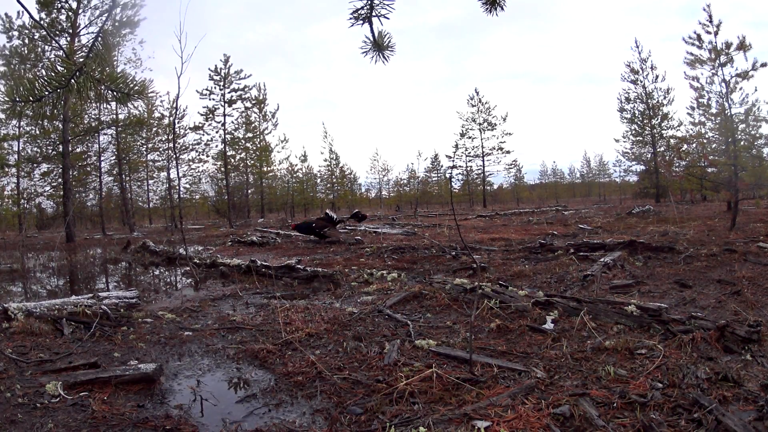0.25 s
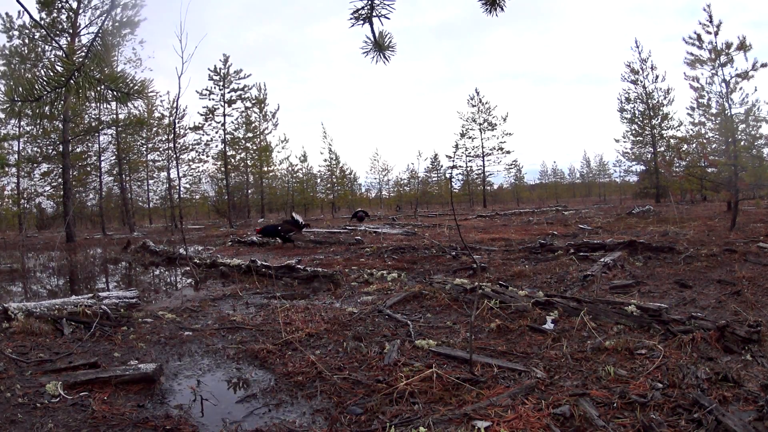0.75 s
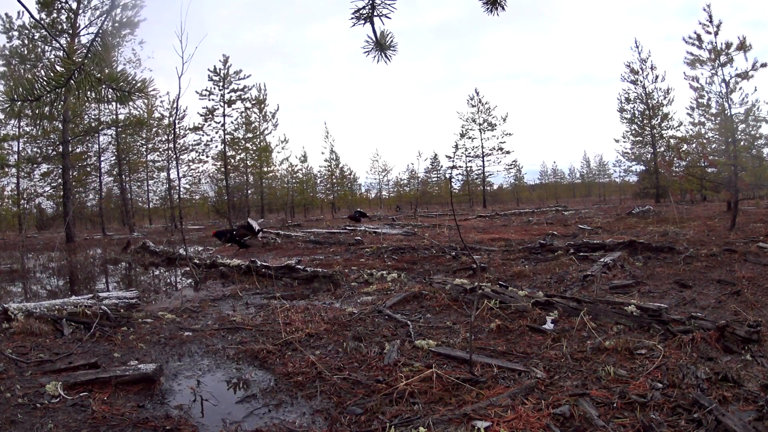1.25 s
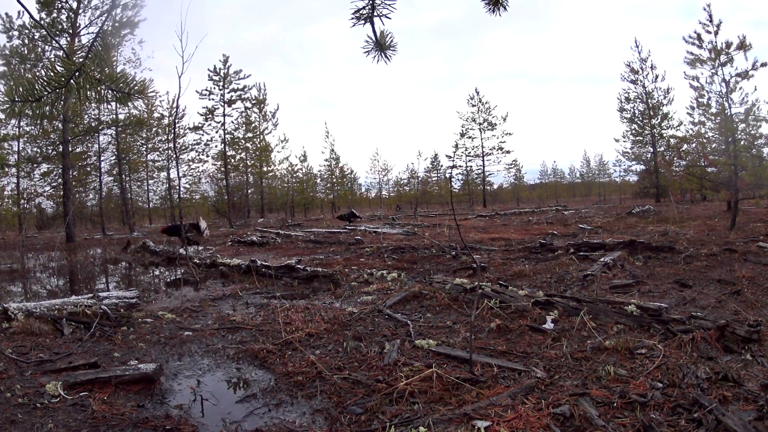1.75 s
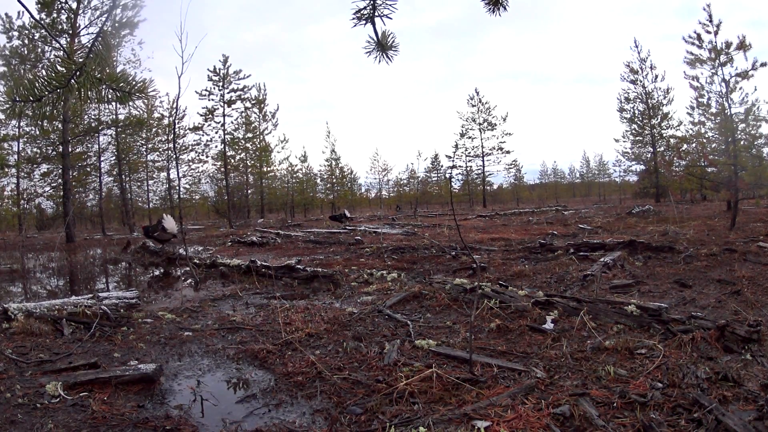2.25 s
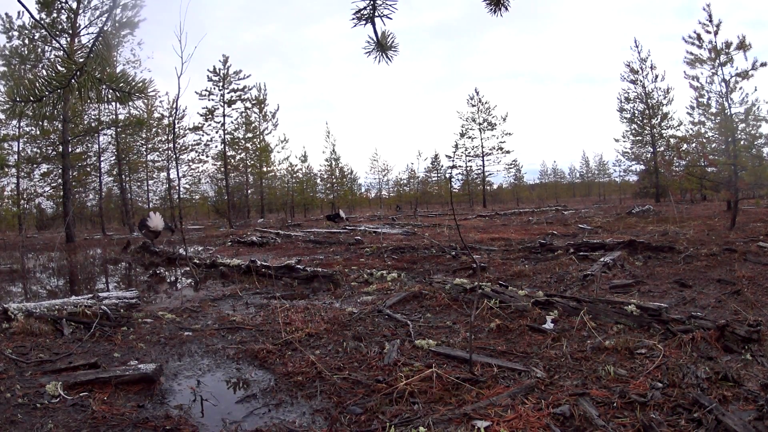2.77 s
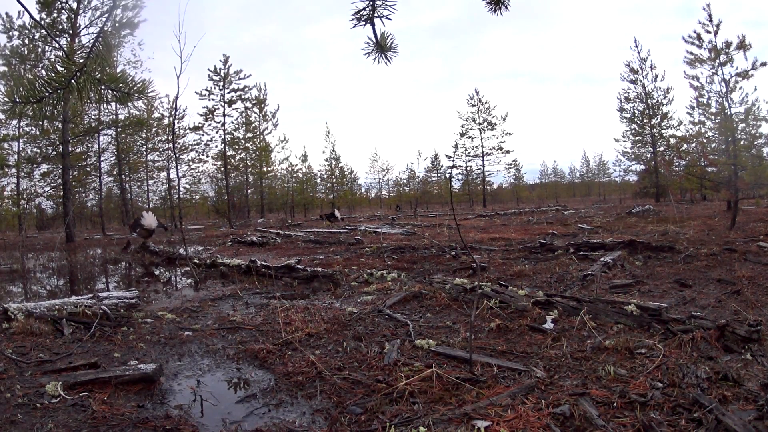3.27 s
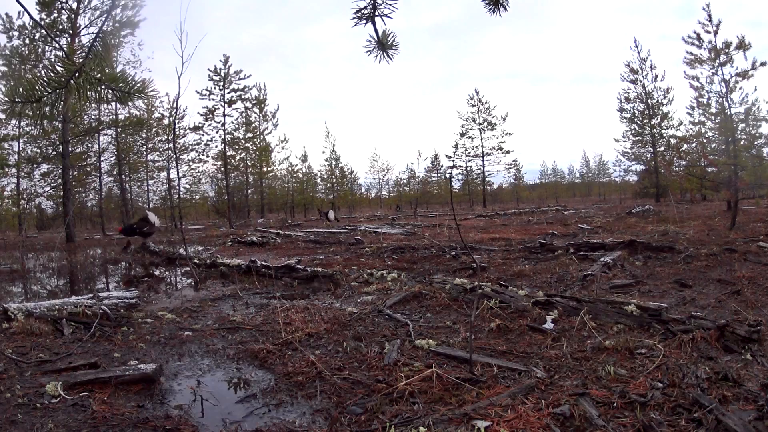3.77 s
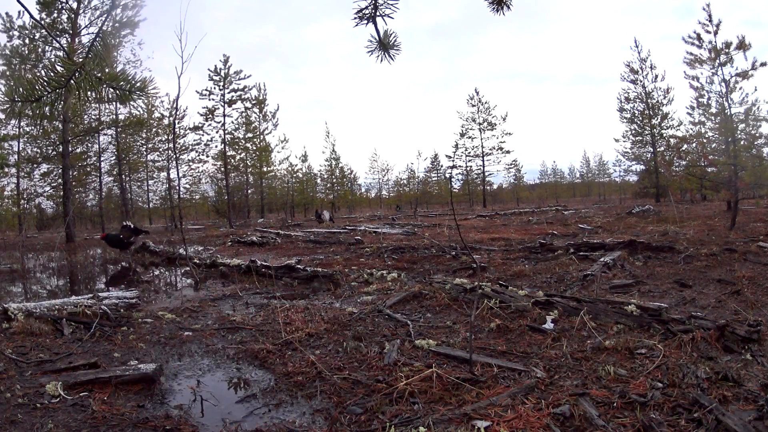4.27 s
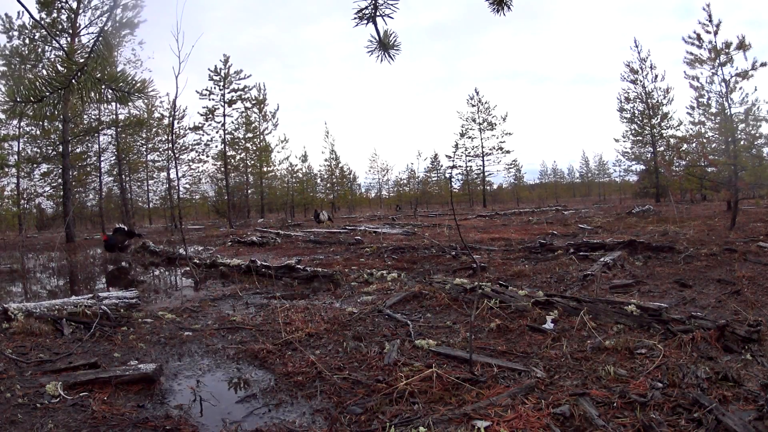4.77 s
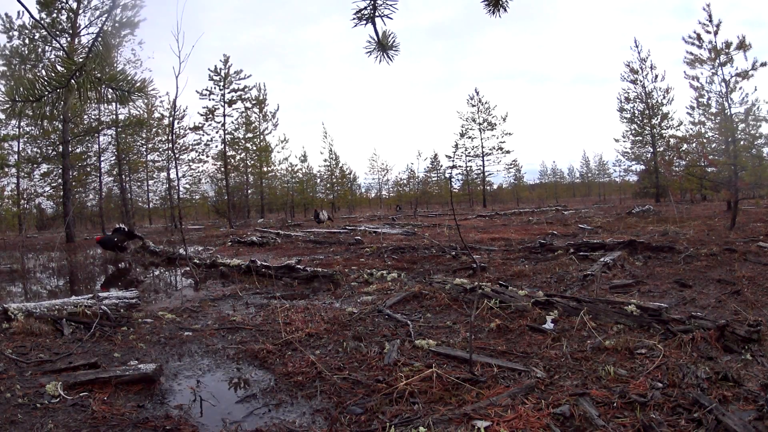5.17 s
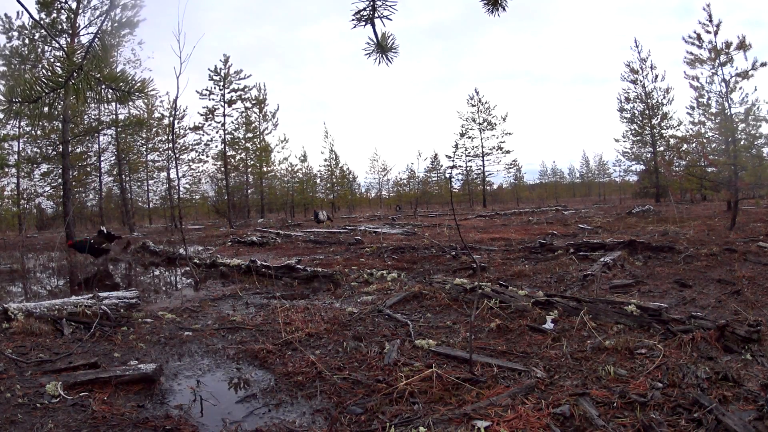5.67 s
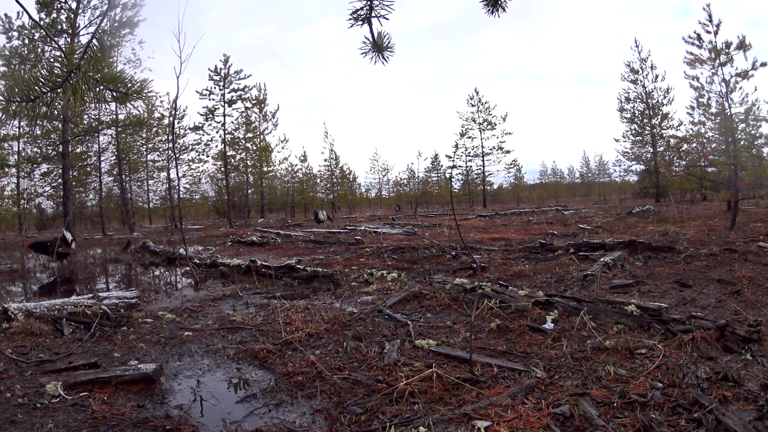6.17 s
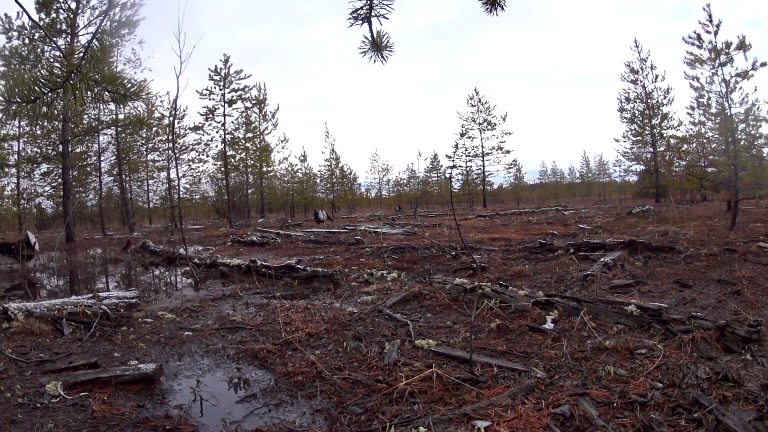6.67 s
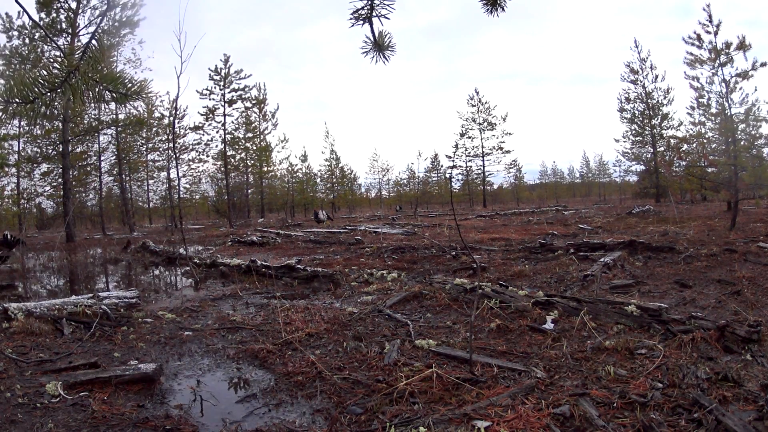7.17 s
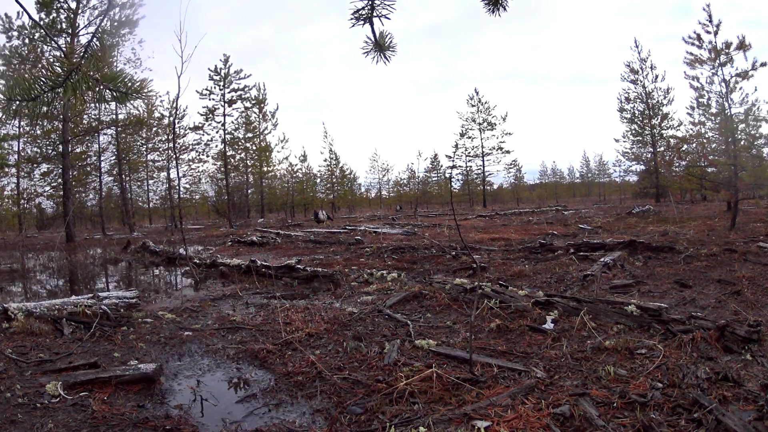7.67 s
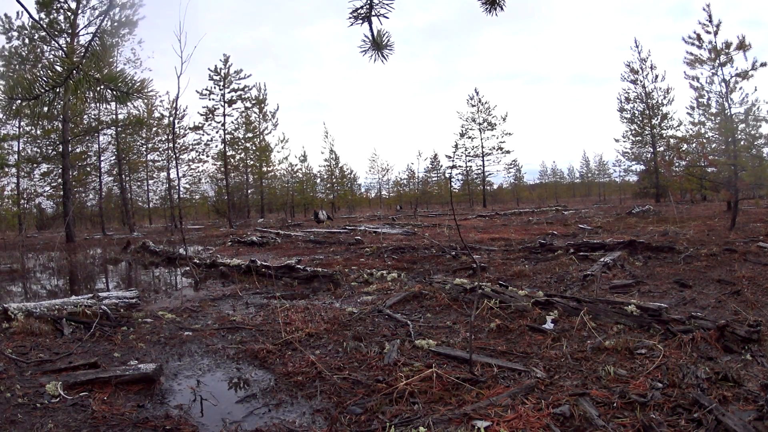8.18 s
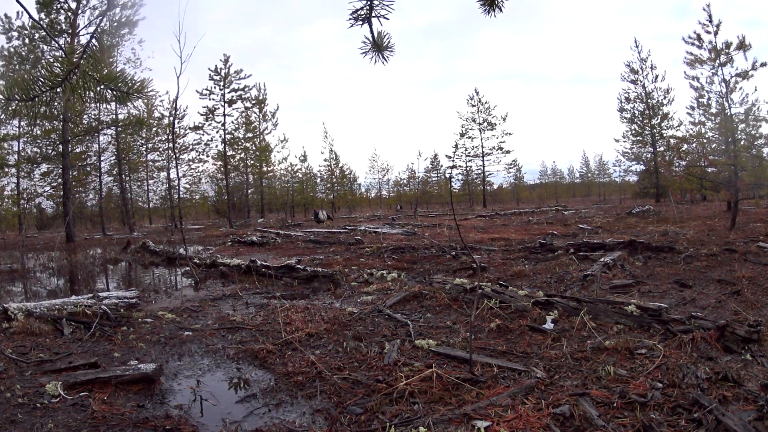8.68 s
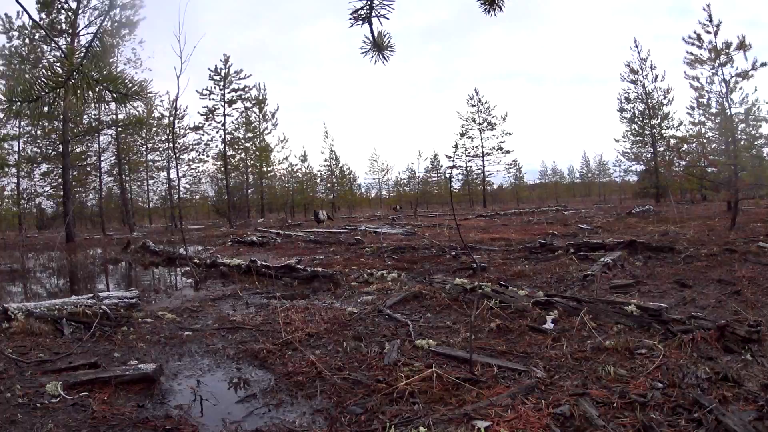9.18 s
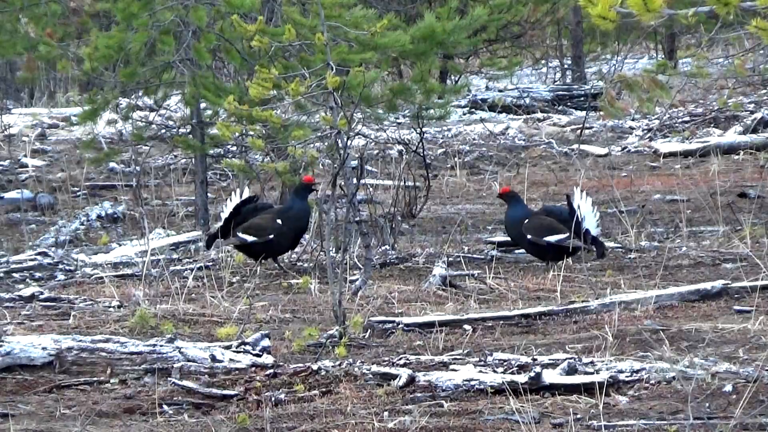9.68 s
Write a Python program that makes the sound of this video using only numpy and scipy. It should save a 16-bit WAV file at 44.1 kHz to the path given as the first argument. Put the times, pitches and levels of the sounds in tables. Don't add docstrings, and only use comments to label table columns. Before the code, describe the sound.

Two male grouse bubble and coo in fast rolling phrases, close by in a wet clearing, with sneezing hisses, twig snaps and soft wind.

```python
import sys
import numpy as np
from scipy import signal
from scipy.fft import rfft, irfft
from scipy.io import wavfile
from scipy.ndimage import uniform_filter1d, minimum_filter1d

SR = 44100
rng = np.random.default_rng(int(sys.argv[2]) if len(sys.argv) > 2 else 0)


def elevation(decibels):
    levels = np.asarray(decibels, float)
    return 10 ** (levels / 20)


def wav_out(sig):
    wavfile.write(sys.argv[1], SR, np.round(np.clip(np.atleast_2d(sig).T, -1, 1) * 32767).astype(np.int16))


N = 437907


def in_time(rows):
    s, *columns = np.transpose(rows)
    return [np.interp(np.arange(N) / SR, s, c) for c in columns]


def at_hz(points):
    hz = np.maximum(np.arange(N // 2 + 1) * SR / N, 1)
    point_hz, value = np.transpose(points)
    return np.interp(np.log(hz), np.log(point_hz), value)


def rms_one(x):
    return x / np.sqrt(np.mean(x ** 2) + 1e-20)


def drift(rate):
    knots = rng.standard_normal(int(N / SR * 40) + 2)
    return np.interp(np.arange(N) / SR * min(rate, 39), np.arange(len(knots)), knots)


def resonance(x, hz, width_hz):
    r = np.exp(-np.pi * width_hz / SR)
    top = [(1 - r * r) / 2, 0, (r * r - 1) / 2]
    return signal.lfilter(top, [1, -2 * r * np.cos(2 * np.pi * hz / SR), r * r], x)


def moving_band(centre_hz, width_hz, skirt_db, steady=0):
    white = rng.standard_normal((4, len(centre_hz)))
    narrow = rms_one(signal.lfilter(*signal.butter(2, width_hz / 2, fs=SR), white[:2]))
    narrow = narrow / (np.hypot(*narrow) + .05) ** np.clip(steady, 0, 1)
    wide = signal.lfilter(*signal.butter(2, 2.9 * width_hz, fs=SR), white[2:])
    slow = rms_one(narrow) + elevation(skirt_db) * rms_one(wide)
    phase = np.cumsum(2 * np.pi / SR * centre_hz)
    return rms_one(slow[0] * np.cos(phase) + slow[1] * np.sin(phase))


def diffuse(spectrum, alike):
    mid, side = rfft(rng.standard_normal((2, N))) * elevation(at_hz(spectrum))
    alike = np.clip(alike, 0, .99)
    return rms_one(irfft(np.sqrt(1 + alike) * mid + np.sqrt(1 - alike) * side * [[1], [-1]], N))


def coo(notes, wobble):
    dip_width_ms = 7.02
    power, pull, pitch = np.zeros(N), np.full(N, 1e-20), np.full(N, 450e-20)
    for s, db, swell_ms, fade_ms, from_hz, to_hz, dip_hz, edge_in, edge_out, ramp, bend in notes:
        first = max(round((s - swell_ms / 400) * SR), 0)
        i = np.arange(first, min(round((s + fade_ms / 400) * SR), N))
        ms = (i / SR - s) * 1000
        swell_ms, fade_ms = max(swell_ms, 3), max(fade_ms, 3)
        side_ms = np.where(ms < 0, swell_ms, fade_ms)
        edge = np.where(ms < 0, edge_in, edge_out)
        shape = elevation(db - 9 * np.abs(ms / side_ms) ** edge + ramp * np.minimum(ms, 0)) ** 2
        along = np.clip((ms + swell_ms) / (swell_ms + fade_ms), -.15, 1.2)
        glide_hz = from_hz + (to_hz - from_hz) * np.sign(along) * np.abs(along) ** bend
        glide_hz = glide_hz - dip_hz * np.exp(-(ms / dip_width_ms) ** 2)
        power[i] += shape
        pull[i] += shape ** 2
        pitch[i] += shape ** 2 * np.clip(glide_hz, 240, 720)
    phase = np.cumsum(2 * np.pi / SR * pitch / pull * (1 + wobble * drift(32)))
    return np.sqrt(power) * elevation(0.85 * drift(37)) * np.sin(phase)


def rolled(notes, growth, last, late_s, gulp_db, gulp_hz):
    note_ms, late_growth_ms = 28, 24
    full = []
    for (s, db, hz), (_, _, next_hz) in zip(notes, notes[1:] + notes[-1:]):
        left_s = notes[-1][0] - s
        late = last if left_s == 0 else 1 - (left_s - .1) / late_s
        ms = note_ms + growth * late_growth_ms * np.clip(late, min(last, 0), 1)
        accent_hz = np.clip(hz - next_hz, 0, 100)
        ms = ms * (1 - 0.004 * accent_hz)
        fall_hz = (2.8 + 0.0515 * accent_hz) * (ms - (1 - 0.44) * max(ms - note_ms, 0))
        share = min(0.67 + 0.32 * max(ms / note_ms - 1, 0), .86)
        peak_s = s + (share - .6) * ms / 1000
        full.append((peak_s, db, share * ms, (1 - share) * ms, hz + .38 * fall_hz, hz - .62 * fall_hz))
    gulps = [(s + fade_ms / 1000 + 0.00595, db + gulp_db, 7.0, 16.0, 0.95 * to_hz, gulp_hz)
             for s, db, _, fade_ms, _, to_hz in full]
    return full + gulps


def roll_edges(notes, dip_hz):
    return [(*note, dip_hz, 7, 3.0, .13, 1.8) for note in notes]


def rolls():
    # (middle [s], peak level [dB], middle pitch [Hz])
    first_roll = [(0.403, -22, 459.7), (0.477, -20.5, 454.7), (0.54, -10, 476.5), (0.592, -22.5, 412.8),
                  (0.672, -21, 415), (0.738, -18.5, 426), (0.811, -19, 423.5), (0.884, -16.5, 431.3),
                  (0.954, -15, 432), (1.022, -16.5, 447), (1.092, -12, 450), (1.162, -13.5, 465.3),
                  (1.227, -14, 456), (1.301, -14.5, 449.5)]
    second_roll = [(2.738, -22, 418), (2.762, -23.5, 370.3), (2.802, -20.5, 452), (2.863, -24, 410),
                   (2.941, -21, 400.5), (3.011, -18.5, 423.5), (3.08, -21.5, 409), (3.153, -17.5, 420.6),
                   (3.223, -17.5, 432), (3.294, -18, 431), (3.363, -18.5, 430), (3.432, -19, 441.6),
                   (3.501, -17.5, 440), (3.569, -17.5, 439), (3.639, -17, 445.6), (3.709, -15, 457),
                   (3.783, -14, 464.6), (3.857, -10, 479), (3.919, -11.5, 502.6), (3.983, -12.5, 493)]
    broken_roll = [(5.46, -14.5, 501), (5.519, -27, 377), (5.589, -24.5, 404), (5.658, -19.5, 414),
                   (5.731, -18, 413), (5.799, -18.5, 422), (5.871, -18.5, 416), (5.94, -15.5, 440.4),
                   (6.007, -17.5, 429), (6.072, -30, 427)]
    false_starts = [(6.727, -26, 395.4), (6.791, -32.5, 413.6), (6.837, -36, 485.4), (6.902, -39, 467),
                    (7.189, -27.5, 526), (7.257, -32.5, 447), (7.32, -34.5, 432.5), (7.381, -32, 451.6),
                    (7.444, -29.5, 485)]
    far_roll = [(7.741, -27.5, 502), (7.809, -31, 439), (7.872, -34, 430.4), (7.935, -27.5, 469),
                (8.004, -25.5, 464.8), (8.068, -25, 465), (8.134, -26.5, 457.4), (8.201, -26.5, 453),
                (8.268, -26.5, 458.3), (8.334, -26.5, 469), (8.4, -25.5, 469.4), (8.466, -26.5, 471.5),
                (8.535, -26.5, 465.5), (8.605, -25.5, 482.4), (8.675, -25.5, 477), (8.747, -23.5, 492.6),
                (8.813, -24, 497.5), (8.882, -24, 507), (8.946, -24, 483.6)]
    # growth, growth of the last note, growing time [s], gulp level [dB]
    played = [(first_roll, .25, .3, .25, -16), (second_roll, .95, .6, .2, -17.5),
              (broken_roll, .07, .1, .25, -16), (false_starts, .07, .1, .25, -10),
              (far_roll, .98, -.3, .45, -17.5)]
    notes = [note for roll, *growing in played for note in rolled(roll, *growing, gulp_hz=308.5)]
    return roll_edges(notes, dip_hz=-5)


def syllable(sung, shape, depth):
    (s, db, hz), (swell_ms, fade_ms, from_hz, to_hz, dip_hz) = sung, shape
    peak_hz = from_hz + (to_hz - from_hz) * swell_ms / (swell_ms + fade_ms) - dip_hz
    start_hz, end_hz = hz + depth * (from_hz - peak_hz), hz + depth * (to_hz - peak_hz)
    return s, db, swell_ms, fade_ms, start_hz, end_hz, depth * dip_hz, 1.35, 1.3, 0, 1


def retimed(shapes, lengths):
    return [(*ms, *shape[2:]) for ms, shape in zip(lengths, shapes)]


def phrases():
    # (swell [ms], fade [ms], pitch at swell [Hz], pitch at fade [Hz], dip at peak [Hz])
    opening = [(2.5, 35.4, 520.4, 572, 5), (28.07, 3.7, 565, 490, 15.4), (3.98, 23.7, 570, 525, 5.3),
               (12.18, 11.5, 605, 486, 85.6), (2.97, 8.9, 570, 454, 5.6), (9.16, 5.03, 402, 520, 6.1),
               (20.15, 12, 580.6, 465, 80.1), (8.82, 13.3, 394, 566, 5), (16.3, 9.96, 539, 402, 85.2),
               (7.9, 21, 313, 592, 4.2), (14.2, 4.5, 568, 457, 6.7), (5.1, 32, 475, 460, 4.5),
               (60.5, 19.2, 580, 550, 6.1), (12, 8, 508, 467, 13.5)]
    closing = [(3, 9.2, 480, 433, 7), (12.26, 9.77, 417, 472, 1.5), (8.66, 7.25, 539, 470, 5.5),
               (9.28, 7.3, 420, 587, 4), (8.66, 16, 600, 490, 83.5), (7.5, 9.5, 625, 515, 6.5),
               (11, 19, 455, 600, 0), (15.9, 13.07, 522.5, 570.4, 79.5), (7.46, 3.9, 400, 560, 2),
               (21.96, 7.7, 479.4, 414, 5.5), (4, 12.2, 431.4, 600, 2), (15.73, 15.14, 543.4, 402.4, 47.5)]
    # (swell [ms], fade [ms])
    opening_clipped = [(3, 28.7), (18, 6.9), (29.7, 19), (8, 6.96), (4.01, 8.3), (8.95, 4.93), (14, 13),
                       (9, 12.6), (8, 12.5), (7.95, 12.5), (14, 5.5), (5, 25), (40, 18.3), (12, 12.2)]
    closing_clipped = [(7.39, 4.5), (6.1, 8.3), (13, 7.4), (10, 3.56), (9, 12.7), (10.96, 10.3),
                       (15.05, 6.2), (39.8, 11.77), (8.68, 3.5), (9.4, 20), (3.5, 8.28), (13.34, 17.2)]
    # (peak [s], peak level [dB], pitch at peak [Hz])
    opening_sung = [
        [(1.528, -24.5, 465), (1.587, -9.5, 509), (1.598, -22, 521), (1.674, -10, 507), (1.752, -16.5, 490),
         (1.765, -11.5, 470), (1.81, -17.5, 475.5), (1.846, -17, 469), (1.881, -17, 416), (1.918, -18.5, 449),
         (1.948, -22, 499), (1.963, -22, 480), (2.03, -27, 501), (2.066, -12.5, 437)],
        [(4.214, -14, 514), (4.261, -7, 501.6), (4.272, -18.5, 560), (4.348, -12, 454.6), (4.431, -13, 481.5),
         (4.443, -9.5, 477), (4.481, -11.5, 457), (4.526, -13, 451), (4.557, -13.5, 434), (4.606, -14, 443),
         (4.641, -10.5, 464), (4.653, -15.5, 477), (4.725, -20.5, 515), (4.743, -7.5, 454.4)],
        [(9.255, -32.5, 510), (9.313, -17.5, 523), (9.323, -24.5, 528), (9.394, -18.5, 548),
         (9.476, -20.5, 512), (9.492, -27, 558), (9.515, -30.5, 505)],
    ]
    closing_sung = [
        [(0.008, -10, 480), (0.035, -14.5, 471), (0.101, 0.5, 592), (0.172, -6.5, 520), (0.209, -8, 461.5),
         (0.253, -9, 479), (0.271, -17.5, 504), (0.299, -20.5, 533), (0.346, -7.5, 446)],
        [(2.171, -15.5, 503), (2.19, -9.5, 493), (2.218, -13.5, 482), (2.248, -15, 502), (2.275, -23, 457.5),
         (2.344, -6.5, 548.7), (2.412, -9.5, 544), (2.452, -15.5, 467.5), (2.491, -15.0, 492),
         (2.516, -20, 481), (2.539, -18.5, 475), (2.592, -14.0, 449.5)],
        [(4.846, -10.5, 496), (4.88, -7, 477), (4.901, -6, 503), (4.935, -10.5, 477), (4.963, -13.5, 469.5),
         (5.026, -0.5, 587), (5.098, -6, 527.6), (5.135, -10, 466), (5.177, -8.5, 476.4), (5.206, -16, 452),
         (5.223, -21, 514.4), (5.272, -9, 448.6)],
    ]
    glide_depths = [.55, .8, .35]
    clipped = retimed(opening, opening_clipped)
    notes = []
    for sung, depth, shapes in zip(opening_sung, glide_depths, [clipped, opening, clipped]):
        notes += [syllable(row, shape, depth) for row, shape in zip(sung, shapes)]
    for sung, shapes in zip(closing_sung, [closing, retimed(closing, closing_clipped), closing]):
        notes += [syllable(row, shape, 0.7494) for row, shape in zip(sung[::-1], shapes[::-1])]
    return notes


def fillings():
    # (peak [s], peak level [dB], pitch [Hz], swell [ms])
    filling = [
        (0.068, -23, 449.7, 11),
        (0.137, -24, 478.2, 9),
        (4.185, -30, 440, 24),
        (4.799, -23, 503, 8),
        (6.695, -32, 360.3, 35.9),
        (7.155, -28, 486, 43.9),
        (7.709, -26, 480, 44),
        (7.795, -37, 401, 34.6),
    ]
    return [(s, db, ms, 6.7, hz, hz, 0, 5, 1.3, 0.15, 1) for s, db, hz, ms in filling]


def rival():
    # (peak [s], peak level [dB], pitch at swell [Hz])
    low_notes = [
        (2.346, -19.5, 404),
        (2.399, -25, 426),
        (2.463, -30, 410.3),
        (2.531, -29.5, 396),
        (5.323, -35, 456),
    ]
    # (first [s], last [s], first level [dB], last level [dB], first pitch [Hz], last pitch [Hz])
    even_rolls = [
        (0.549, 1.271, -24.5, -19, 478.5, 518),
        (2.921, 3.272, -27, -21.5, 430, 487.6),
    ]
    beat_s = .068
    notes = [(s, db, 15, 18.83, hz, 349, 0, 2.2, 2.2, 0, 1) for s, db, hz in low_notes]
    for first_s, last_s, first_db, last_db, first_hz, last_hz in even_rolls:
        count = round((last_s - first_s) / beat_s) + 1
        roll = np.linspace([first_s, first_db, first_hz], [last_s, last_db, last_hz], count).tolist()
        full = rolled(roll, growth=0.298, last=-.5, late_s=0.2503, gulp_db=-20.5, gulp_hz=330.0)
        notes += roll_edges(full, dip_hz=0)
    return notes


def hiss(rows, width_hz, mouth_db):
    # (centre [Hz], width [Hz], level [dB])
    beak_bands = [(5900, 1100, -3), (7200, 800, 2), (8900, 820, -3), (10350, 1100, -2.5)]
    out = np.zeros(N)
    span = slice(round(rows[0][0] * SR), round(rows[-1][0] * SR) + 99)
    throat_hz, throat_db, beak_db, mouth_hz = [c[span] for c in in_time(rows)]
    flutter_hz = throat_hz * (1 + .006 * drift(30)[span])
    throat = moving_band(flutter_hz, width_hz, skirt_db=-5.5, steady=.4)
    throat = throat + elevation(-10) * moving_band(.96 * throat_hz, 300, skirt_db=-17.5)
    throat = elevation(throat_db + 1.4 * drift(35)[span]) * throat
    mouth = moving_band(mouth_hz, 200, skirt_db=-5.5)
    mouth = elevation(beak_db + mouth_db + 1.5 * drift(28)[span]) * mouth
    third = moving_band(3.02 * mouth_hz, 700, skirt_db=-2.0)
    third = elevation(beak_db + 1.5 + 2.5 * drift(25)[span]) * third
    white = rng.standard_normal(len(mouth_hz))
    beak = np.zeros(len(white))
    for k, (hz, width, db) in enumerate(beak_bands):
        beak += (-1) ** k * elevation(db + 2.2 * drift(13)[span]) * resonance(white, hz, width)
    out[span] = throat + mouth + third + elevation(beak_db + 0.5) * rms_one(beak)
    return out


def steps(snap_ms, rustle_ms, rustle_db, ring_db):
    # (time [s], peak level [dB], ring
    # [Hz])
    pacing = [(0.1695, -40, 3320), (0.5314, -50, 3430), (0.7544, -45, 9140), (0.842, -35.5, 7050),
              (1.0695, -47, 3490), (1.1453, -37.5, 4660), (1.3116, -49, 3433), (1.3227, -40, 4174),
              (1.47, -43, 8450), (1.4847, -35, 3430), (1.769, -28.5, 2700), (1.7716, -27, 6550),
              (1.8248, -41, 6540), (1.8662, -42, 3620), (1.956, -39, 7300), (2.0333, -46, 3940),
              (2.361, -38, 4010), (2.5071, -42, 3942), (4.0433, -35.5, 5300), (4.2613, -27.5, 10100),
              (4.7072, -50, 6705), (4.752, -38, 9520), (4.765, -33, 10100), (4.7744, -37, 6900),
              (4.792, -34, 7350), (4.8697, -29.5, 8950), (4.9072, -45.5, 3555),
              (5.2895, -44, 3890), (5.3176, -45, 4206), (5.3541, -27.5, 7200), (5.452, -39.5, 5640),
                (5.582, -32, 10600), (5.6863, -47, 5980), (5.7027, -36, 9070), (5.7723, -16.5, 7030),
                (5.785, -42, 5690), (5.8221, -38, 3620), (5.8326, -40, 3690), (5.836, -36, 5080),
                (5.8472, -22.5, 6370), (5.9357, -47, 5550), (5.9663, -41, 9440), (5.9921, -21.5, 7200),
                (5.9947, -25, 7390), (6.1195, -39, 5060), (6.2144, -22, 7500), (6.2173, -29, 7120),
                (6.2751, -43, 6710), (6.303, -45, 3990), (6.322, -44, 6420), (6.3394, -46, 5030),
                (6.3654, -55, 3450), (6.45, -43, 7400), (6.4608, -25, 6840), (6.4844, -40, 7440),
                (6.5231, -41, 4170), (6.556, -44, 5420), (6.5949, -44, 6720), (6.663, -34.5, 7380),
                (6.9795, -50, 6760), (6.9964, -40, 5900), (7.0469, -45, 7240), (7.0643, -40, 6780),
                (7.0834, -43, 7210), (7.1566, -46, 5670)]
    lag_s = 0.0014
    footfalls = pacing
    out, ms = np.zeros(N + 4000), np.arange(-600, 1400) / SR * 1000
    grains = rng.standard_normal((len(footfalls), 2, len(ms)))
    for (s, db, hz), (sharp, soft) in zip(footfalls, grains):
        snap = sharp * np.exp(-np.abs(ms) / np.where(ms < 0, snap_ms / 0.98, snap_ms))
        snap = snap + elevation(ring_db) * resonance(snap, hz, 1400)
        rustle = elevation(rustle_db - 0.46 * db) * soft * np.exp(-np.abs(ms) / rustle_ms)
        start = round((s + lag_s) * SR)
        out[start:start + len(ms)] += elevation(db) * (snap / np.abs(snap).max() + rustle)
    return signal.sosfilt(signal.butter(2, 2200, "high", fs=SR, output="sos"), out[600:N + 600])


def crackle(grains_per_s, spread_db):
    # (middle [s], length [ms], level [dB], centre [Hz])
    swishes = [(0.094, 20, -49, 10500), (.175, 15, -58.5, 9100), (.41, 28, -65, 6600),
               (.535, 20, -61, 9470), (.74, 35, -64, 7000), (1.49, 35, -61, 8500), (1.775, 28, -55, 7000),
               (1.8, 24, -57, 6800), (1.83, 22, -57, 8500), (2.405, 19, -62, 9000),
               (4.769, 65, -50.5, 9810), (4.875, 18, -58, 9000), (5.022, 28, -53, 10000),
               (5.085, 42, -53, 8500), (5.34, 33, -60, 10390), (5.455, 22.6, -62, 7500),
               (5.585, 28, -49, 9800), (5.69, 31, -64, 7510), (5.8, 23, -60, 7930), (5.865, 30, -62, 6760),
               (5.997, 22, -56, 7980), (6.235, 31, -57, 7500), (6.325, 15, -59, 7500),
               (6.456, 32, -57, 6990), (6.79, 46, -57, 6890), (6.839, 29, -58, 7000),
               (6.985, 26, -64, 8000), (7.069, 56, -55.5, 8000), (7.28, 45, -63, 7010)]
    out, ms = np.zeros(N + 6000), np.arange(-3000, 3000) / SR * 1000
    draws = rng.random((len(swishes), 2, len(ms)))
    for (s, length_ms, db, hz), (mark, size) in zip(swishes, draws):
        grains = (size - .5) * elevation(spread_db * (mark < grains_per_s / SR))
        centre_hz = min(hz, 11000)
        puff = resonance(resonance(grains, centre_hz, 4200), centre_hz, 4200)
        out[round(s * SR):][:len(ms)] += elevation(db) * rms_one(puff) * np.exp(-(2 * ms / length_ms) ** 2)
    return out[3000:N + 3000]


def tree_echoes(x, t60, dull_hz):
    t = np.arange(SR // 2) / SR
    tail = rng.standard_normal((2, len(t))) * elevation(-60 * t / t60) * (t > .012)
    tail = tail + 1.6 * tail.sum(0)
    tail = signal.lfilter(*signal.butter(1, dull_hz, fs=SR), tail)
    return signal.fftconvolve(x[None], tail / np.sqrt(np.sum(tail ** 2) / 2), axes=1)[:, :N]


def wind():
    # (time [s], wind level [dB])
    weather = [(0, -74), (4.3, -69.5), (4.65, -54.5), (5.0, -64.5), (5.7, -66), (6.05, -57.5), (6.4, -68.5),
               (7.6, -68), (7.9, -48.5), (8.1, -58.5), (8.35, -43), (8.8, -59), (9.02, -51.5), (9.2, -51.5),
               (9.4, -62)]
    wind_db, = in_time(weather)
    gusts = diffuse([(15, -23.5), (40, -12), (100, -8.0), (200, -15.0), (400, -57.5)], alike=.8)
    return elevation(wind_db + 2.8 * drift(14)) * gusts


def forest_air():
    # (frequency [Hz], level per Hz [dB])
    colour = [(18, -13), (100, -4), (700, 4.5), (1310, -7), (2600, -12), (4000, -19), (11000, -26),
              (14000, -79)]
    # (frequency [Hz], likeness [ratio])
    likeness = [(60, 0.76), (270, 1), (570, 1), (1200, 0.58), (2600, 0.066), (5500, 0.14), (11600, 0.78)]
    air = elevation(np.linspace(-43, -45, N) + 0.16 * drift(1.5)) * diffuse(colour, at_hz(likeness))
    return air + elevation(-63) * moving_band(np.full(N, 200.5), 8.0, skirt_db=-32.5)


def far_air():
    # (frequency [Hz], level per Hz [dB])
    far_colour = [(20, -40), (60, -12), (400, -15.5), (950, -18), (1900, -25.5), (4300, -36.5),
                  (12000, -40), (15500, -50.5)]
    return elevation(-52.0) * diffuse(far_colour, 0.82)


def ports(x, leak_db):
    # (frequency [Hz], left minus right level [dB])
    port_db = [(60, 3.5), (130, 0.5), (300, 7), (570, -1.5), (1220, -2), (2580, -2.5), (5470, -0.5),
               (11000, 1)]
    # (frequency [Hz], phase the left leads by [rad])
    port_lead = [(20, 0.71), (430, -0.9), (860, -0.35), (1290, -0.98), (4390, 0.62), (7900, 0.71),
                 (11000, 0.97)]
    top_hz = 11100
    tilt = elevation(at_hz(port_db) / 2) * np.exp(.5j * at_hz(port_lead))
    cut = elevation(at_hz([(top_hz, 0), (1.01 * top_hz, leak_db), (15000, leak_db - 20), (15700, -140)]))
    return irfft(rfft(x) * [tilt, 1 / tilt] * cut, N)


def panned(x, left_minus_right_db):
    return x * elevation(left_minus_right_db * [[.5], [-.5]])


def scene():
    # (time [s], left minus right level [dB])
    turning = [(0, -2), (1.3, -1), (2.5, -1), (3.4, 1.5), (4.0, 0), (5.3, 0.8), (5.6, 2), (6.9, 1),
               (7.15, -1.5), (8.9, -2), (9.3, -1.5)]
    # (time [s], throat resonance [Hz], throat [dB], beak hiss [dB], mouth resonance [Hz])
    breaths = [
        [(0, 1412, -38.5, -56.5, 1590), (.06, 1494, -37.5, -65.5, 1597), (.11, 1470, -42, -62, 1650),
         (.17, 1440, -48, -63, 1717), (.25, 1434, -56.5, -75.5, 1785)],
        [(3.8, 1349, -53.5, -70.5, 2010), (3.825, 1370, -44, -53.5, 2080), (3.86, 1370, -34.5, -57, 2102),
         (3.925, 1350, -37, -69, 1448), (3.96, 1090, -34, -63, 1417), (4.05, 1082, -35.5, -63, 1400),
         (4.12, 1130, -36.5, -65, 1433), (4.17, 1170, -35.5, -59.5, 1440), (4.2, 1180, -64.5, -83, 1452)],
        [(4.12, 1327, -54.5, -82.5, 1486), (4.18, 1400, -37, -59.5, 1507), (4.26, 1441, -33.5, -53.5, 1504),
         (4.31, 1490, -32.5, -52.5, 1480), (4.36, 1380, -31.5, -54, 1476), (4.43, 1374, -32.5, -51, 1500),
         (4.47, 1385, -33, -53.5, 1643), (4.53, 1370, -37, -51.5, 1650), (4.62, 1383, -42.5, -53.5, 1727),
         (4.655, 1430, -54.5, -64.5, 1800)],
        [(9.518, 1570, -41.5, -59, 1616), (9.545, 1450, -45, -62, 1610), (9.6, 1370, -47.5, -71, 1666),
         (9.71, 1240, -54, -83, 1550), (9.82, 1410, -54, -73, 1620), (9.93, 1575, -59, -78, 1730)],
    ]
    jump_s = 9.518
    turn_db, = in_time(turning)
    voices = coo(phrases() + rolls() + fillings(), wobble=0.0116) + coo(rival(), wobble=0.0091)
    hisses = hiss(breaths[0], 35, 14.4) + hiss(breaths[1], 65, 6.4) + hiss(breaths[2], 60, 11.0)
    feet = elevation(3.5) * steps(snap_ms=0.46, rustle_ms=6.0, rustle_db=-33.0, ring_db=10.0)
    litter = feet + crackle(grains_per_s=530, spread_db=13.5)
    echoes = elevation(-25) * tree_echoes(voices + hisses + feet, t60=0.3, dull_hz=2700)
    near = panned(voices, turn_db) + panned(hisses, np.array(-1.2))
    near = near + panned(litter, np.linspace(1, 4, N))
    overshoot = feet ** 3
    near = ports(near + echoes + forest_air() + wind(), leak_db=-79) + ports(overshoot, leak_db=25.5)
    far = hiss(breaths[3], 90, 4.0) + far_air()
    fade = np.clip((np.arange(N) / SR - jump_s) / 0.0007, 0, 1)
    return near * (1 - fade) + far * fade


def low_pass(x):
    return signal.sosfilt(signal.butter(12, 15700, fs=SR, output="sos"), x)


def record(dry):
    ceiling = .62
    peak = -minimum_filter1d(-np.abs(dry).max(0), size=131)
    gain = uniform_filter1d(np.minimum(1, ceiling / (peak + 1e-9)), size=45)
    return low_pass(dry * gain)


dry = scene()
out = record(dry)
wav_out(out)
```